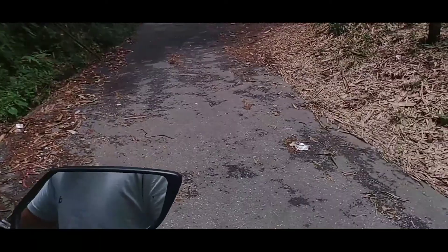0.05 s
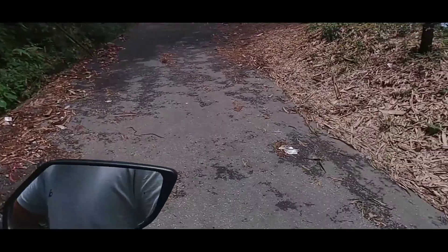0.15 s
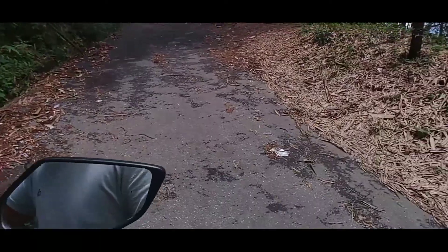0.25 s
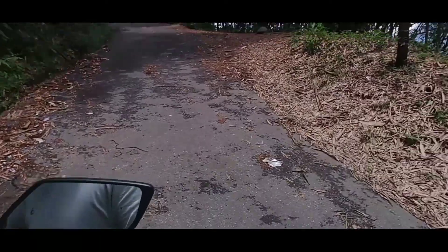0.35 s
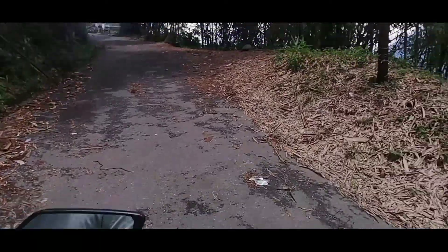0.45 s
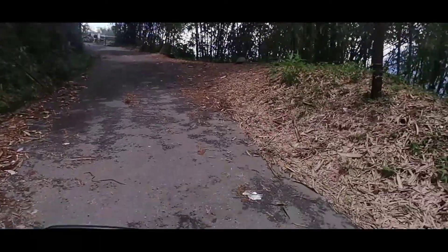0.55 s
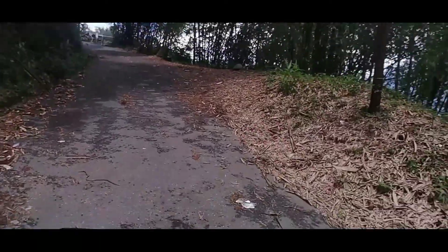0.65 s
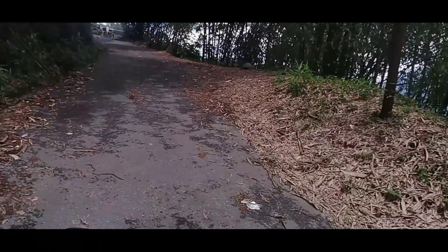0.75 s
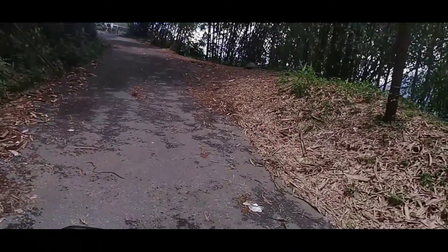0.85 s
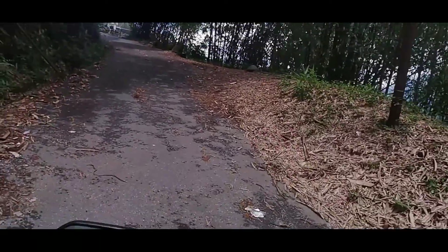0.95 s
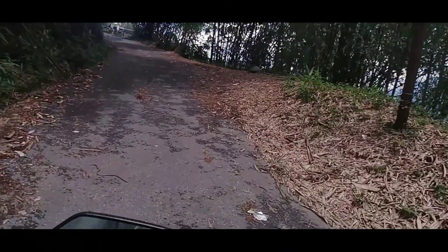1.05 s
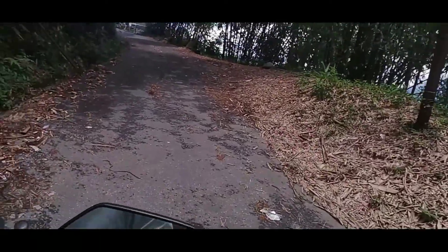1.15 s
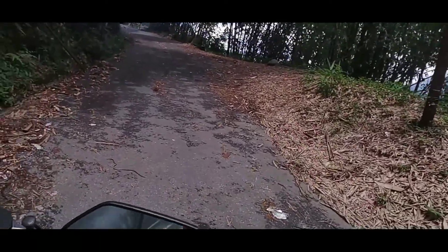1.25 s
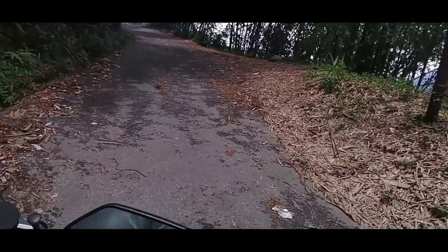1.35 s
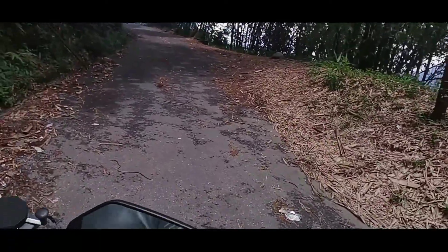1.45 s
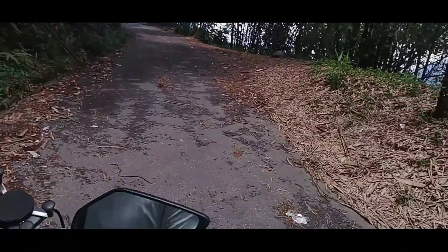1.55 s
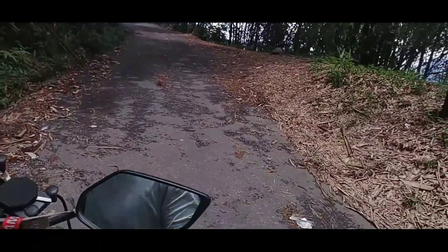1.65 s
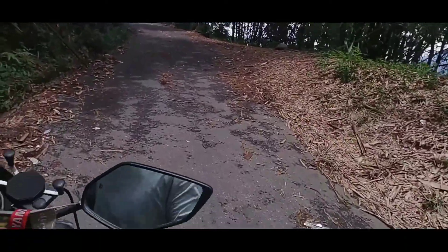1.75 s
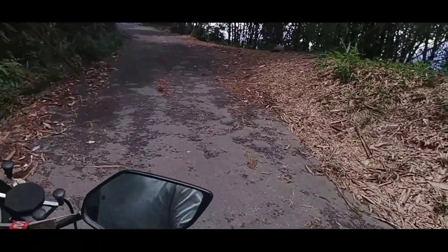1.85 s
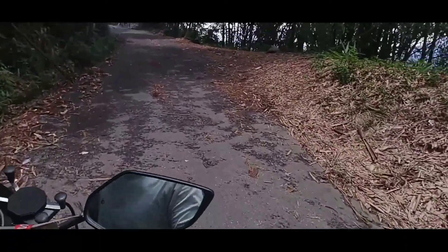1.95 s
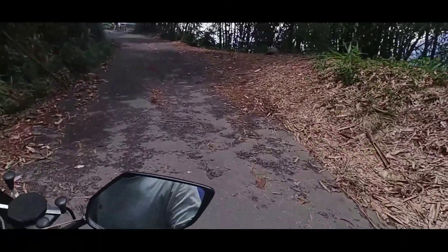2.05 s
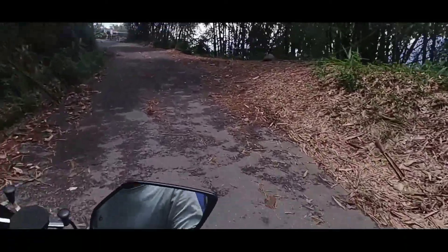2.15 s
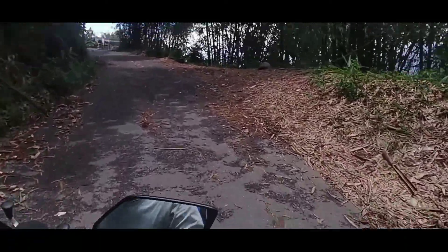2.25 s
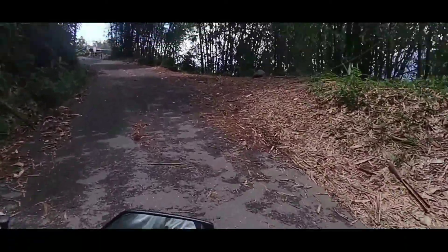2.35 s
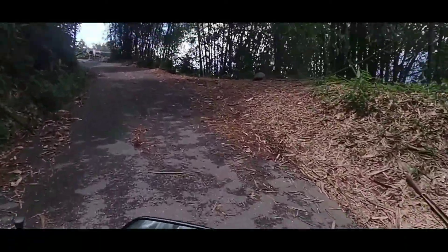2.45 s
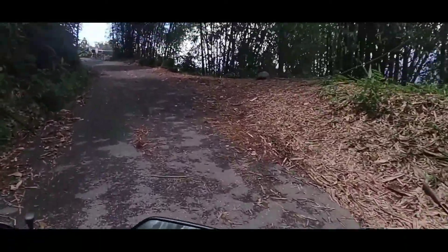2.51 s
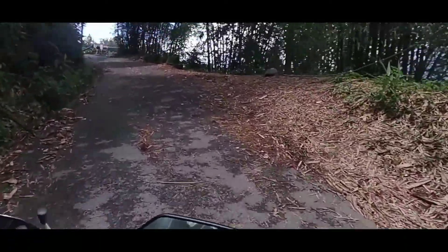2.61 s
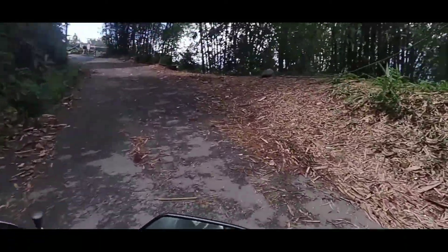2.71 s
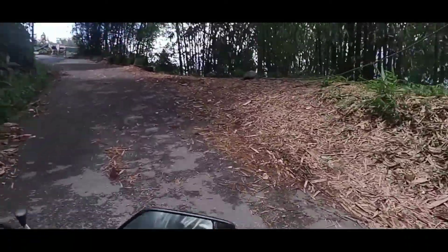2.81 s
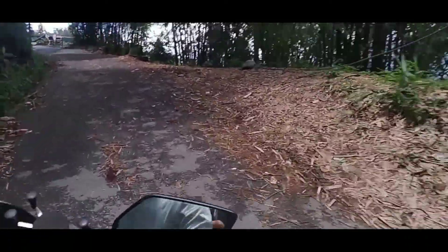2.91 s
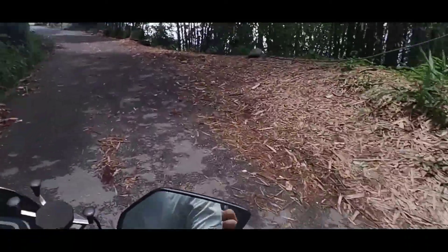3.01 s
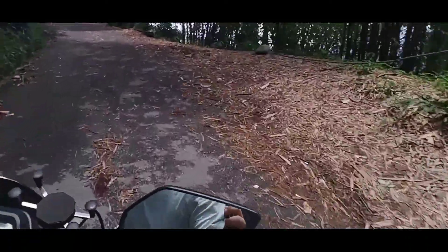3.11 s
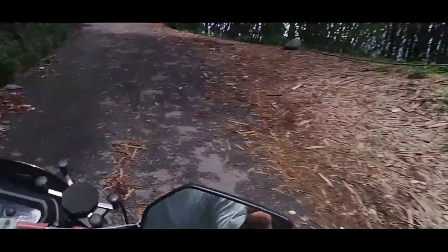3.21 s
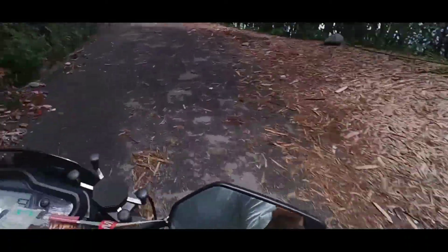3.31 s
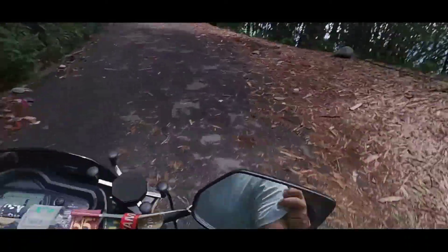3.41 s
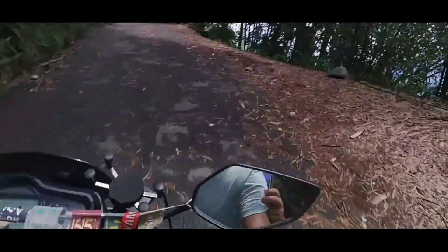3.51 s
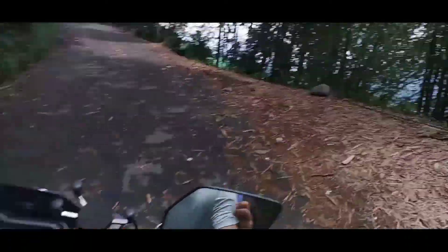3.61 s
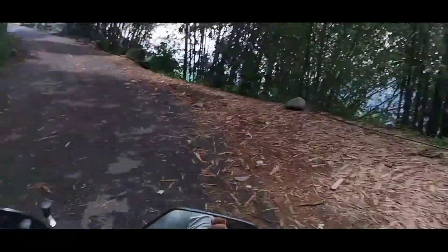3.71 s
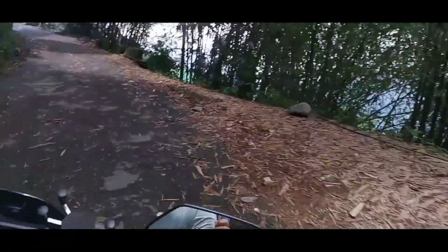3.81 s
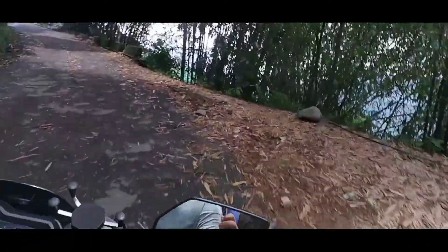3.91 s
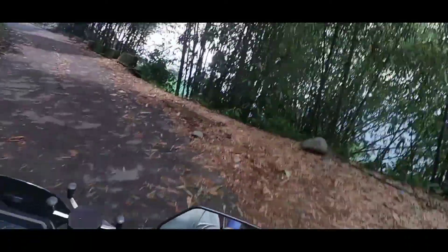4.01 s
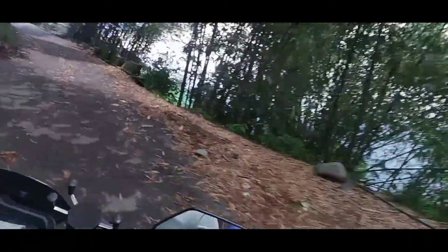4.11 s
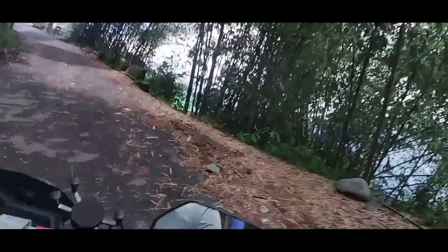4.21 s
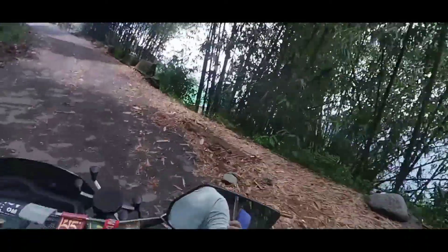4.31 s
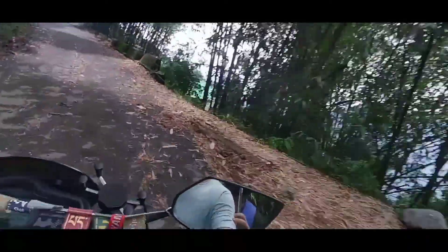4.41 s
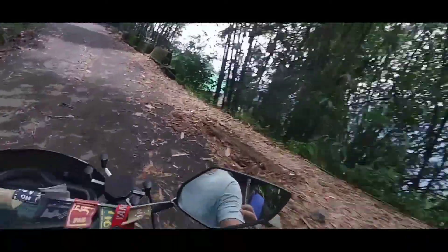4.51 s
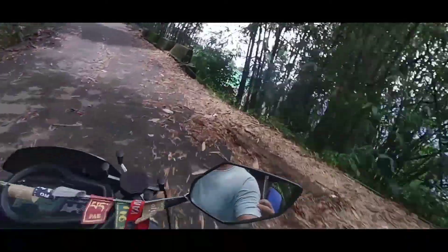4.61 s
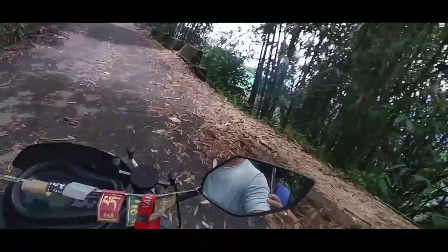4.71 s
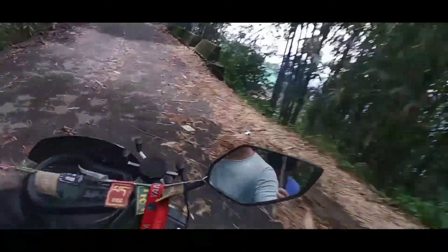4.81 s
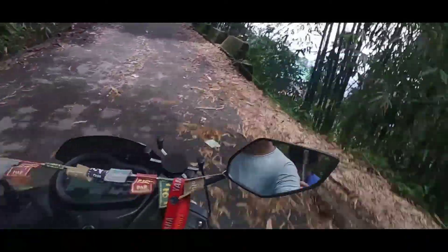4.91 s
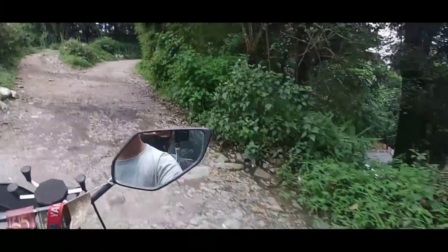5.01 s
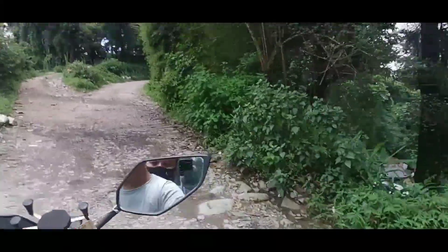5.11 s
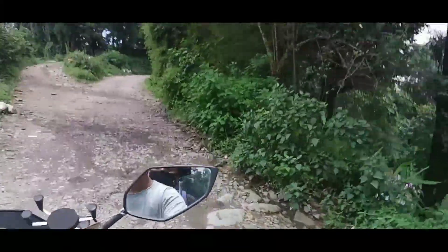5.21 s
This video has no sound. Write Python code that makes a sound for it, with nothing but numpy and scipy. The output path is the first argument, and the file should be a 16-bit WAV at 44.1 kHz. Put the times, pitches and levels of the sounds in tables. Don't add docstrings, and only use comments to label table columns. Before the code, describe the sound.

After brief silence, a small single-cylinder scooter putters up a hill road, pulls harder with rattles and wind gusts, then cuts to faint soft pulsing.

```python
import sys
import numpy as np
from scipy import signal
from scipy.io import wavfile
from scipy.ndimage import uniform_filter1d

SR = 44100
rng = np.random.default_rng(int(sys.argv[2]) if len(sys.argv) > 2 else 0)


def transcribe(u):
    v = np.clip(np.atleast_2d(u).T, -1, 1)
    q = np.round(v * 32767).astype(np.int16)
    wavfile.write(sys.argv[1], SR, q)


def to_linear_factor(level_db):
    exponent = np.asarray(level_db, float) / 20
    return 10 ** exponent


N = 231717
CRUISE_SPEED = 28


def evened(x):
    return x / np.sqrt(np.mean(x ** 2) + 1e-20)


def curves(rows):
    time_s, *columns = np.transpose(rows)
    return [np.interp(np.arange(N) / SR, time_s, column) for column in columns]


def drift(hz):
    steps = np.interp(np.arange(N) / SR * hz, np.arange(600), rng.standard_normal(600))
    return evened(uniform_filter1d(steps, size=int(SR / hz)))


def noise(points, size, patchy_db):
    frames = 4 * N // size + 5
    hz = np.fft.rfftfreq(size, 1 / SR)
    real, imaginary, patches = rng.standard_normal((frames, len(hz), 3)).T
    patches = uniform_filter1d(patches, size=8, axis=0)
    patches = evened(uniform_filter1d(patches, size=8, axis=1))
    point_hz, point_db = np.transpose(points)
    colour_db = np.interp(np.log(hz + 1), np.log(point_hz + 1), point_db, left=-90, right=-90)
    spectra = (real + 1j * imaginary) * to_linear_factor(colour_db[:, None] + patchy_db * patches)
    return evened(signal.istft(spectra, nperseg=size, noverlap=3 * size // 4)[1][:N])


def humming(modes):
    hz = np.geomspace(300, 3500, num=500)
    peaks = sum(to_linear_factor(db) / (1 + (2 * (hz - mode_hz) / width_hz) ** 2) for mode_hz, width_hz, db in modes)
    return noise(np.transpose([hz, 20 * np.log10(peaks)]), size=2048, patchy_db=1.)


def flare(cycles, at, sharp):
    return np.exp(sharp * (np.cos(2 * np.pi * (cycles - at)) - 1))


def order(k, cycles, single):
    shift = 1.2 - 1.4 * k if k > 8 else (k % 2) * (k > 4)
    gather = ((.28 - 1.07 * k - shift + 1) % 2 - 1) * (k > 2)
    return np.sqrt(2) * np.cos(2 * np.pi * k * cycles + np.pi * (shift + single * gather))


def exhaust(speed, cycles, level_db):
    # order (multiple of the firing rate), level_db
    setting_off = [(1, -10), (2, -10), (3, -34), (4, -0.5), (5, 0), (6, -8.5), (7, -8), (8, -4.5), (9, -26),
                   (10, -18), (11, -13), (12, -15), (13, -16), (14, -25), (15, -45), (16, -20), (17, -22),
                   (18, -50), (19, -24), (20, -20.5), (21, -45), (22, -37)]
    # order, level_db
    biting = [(1, -23), (2, -8), (3, -5), (4, 0), (5, -2), (6, -14), (7, -7), (8, -7), (9, -14), (10, -6),
              (11, -2), (12, -10), (13, -13), (14, -20), (15, -22), (16, -18), (17, -27), (18, -23),
              (19, -26), (20, -21), (21, -25), (22, -18)]
    # order, level_db
    slow = [(1, -24), (2, -8), (3, -1.5), (4, 0), (5, -5.5), (6, -12), (7, -6), (8, -17), (9, -11),
            (10, -12), (11, -9), (12, -17), (13, -18), (14, -20), (15, -25), (16, -19), (17, -25),
            (18, -22), (19, -21), (20, -24), (21, -22), (22, -19)]
    # order, level_db
    cruise = [(1, -23), (2, -4), (3, -3.5), (4, 1), (5, -11.5), (6, -10), (7, -6.5), (8, -20), (9, -17.5),
              (10, -21.5), (11, -22), (12, -42), (13, -21.5), (14, -25.5), (15, -63), (16, -23.5),
              (17, -23), (18, -22), (19, -23.5), (20, -55), (21, -52), (22, -28)]
    # order, level_db
    picking_up = [(1, -25), (2, -3), (3, -1.5), (4, 1.5), (5, -25), (6, -3), (7, -10), (8, -11.5), (9, -33),
                  (10, -22), (11, -35), (12, -38), (13, -26.5), (14, -21), (15, -35), (16, -40), (17, -31),
                  (18, -29), (19, -32), (20, -30), (21, -33), (22, -21)]
    # order, level_db
    pull = [(1, -29), (2, 0), (3, -9), (4, -8), (5, -20), (6, -22), (7, -26), (8, -26), (9, -32), (10, -28),
            (11, -31), (12, -31), (13, -35), (14, -36), (15, -31), (16, -35), (17, -33), (18, -31),
            (19, -34), (20, -34), (21, -35), (22, -38)]
    # order, level_db
    steadying = [(1, -29), (2, 0), (3, -11), (4, -9), (5, -17), (6, -24), (7, -26), (8, -30), (9, -36),
                 (10, -35), (11, -30), (12, -32), (13, -38), (14, -34), (15, -33), (16, -34), (17, -29),
                 (18, -34), (19, -38), (20, -30), (21, -31), (22, -38)]
    # order, level_db
    hauling = [(1, -28), (2, 0), (3, -13), (4, -10), (5, -19), (6, -25), (7, -23), (8, -22), (9, -25),
               (10, -25), (11, -23), (12, -26), (13, -31), (14, -30), (15, -28), (16, -29), (17, -25),
               (18, -34), (19, -36), (20, -27), (21, -38), (22, -34)]
    # order, level_db
    fast = [(1, -27), (2, 0), (3, -13), (4, -10), (5, -16), (6, -17), (7, -18), (8, -22), (9, -22),
            (10, -17), (11, -24), (12, -24), (13, -26), (14, -26), (15, -22), (16, -25), (17, -24),
            (18, -26), (19, -26), (20, -31), (21, -32), (22, -35)]
    pattern_speeds = (24.4, 24.6, 24.75, 24.95, 25.4, 25.9, 27.9, 29.3, 33, 35.5, 37.5, 38.5, 39.6)
    # pitch_hz, level_db
    boom = [(48.5, -48), (52, -43), (57, -40), (63.5, -32), (69.5, -22.5), (74, -29.5), (79, -21),
            (82, -25)]

    stages = [setting_off, biting, biting, slow, slow, cruise, cruise, picking_up,
              pull, pull, steadying, hauling, fast]
    patterns = np.array(stages)[:, :, 1]
    patterns = patterns - patterns[:, 3:4]
    single = np.interp(speed, (24.7, 25.1), (1, 0))
    wobble = .003 * drift(25.)
    boom_db = np.interp(2 * speed, *np.transpose(boom))
    out = np.zeros(N)
    for k, row in enumerate(patterns.T, 1):
        order_db = boom_db if k == 2 else level_db + np.interp(speed, pattern_speeds, row)
        waver_db = (.5 + 0.058 * k) * drift(12.)
        loose = .007 * drift(4.) * (k > 8)
        out += to_linear_factor(order_db + waver_db) * order(k, cycles + wobble + loose, single)
    return out


def follows(rule, speed, strain_db):
    cruise_db, db_per_rate, share = rule
    easy_db = -44
    return cruise_db + db_per_rate * (speed - CRUISE_SPEED) + share * (strain_db - easy_db)


def works(speed, cycles, casing_db):
    # cruise_db, db_per_rate [dB per firing/s], share of the strain
    chain_rule = (-59, 0.24, 0.17)
    # cruise_db, db_per_rate, share
    valve_rule = (-54, -0.48, 0.28)
    # cruise_db, db_per_rate, share
    bracket_rule = (-57, 0.25, 0.11)
    # time_s, share
    ticking = [(.7, .3), (1.0, .75), (1.3, .8), (1.5, 1), (1.75, .9), (1.88, 1.2), (2.0, .6), (2.1, 1.35),
               (2.33, 1.35), (2.45, .8), (2.7, 1), (3.0, .75)]
    flare_speeds = (25.5, 27, 30, 35)
    first_flare = ((.25, .3, .3, .15), (.5, .4, .5, 1.1))
    second_flare = ((.53, .72, .75, .7), (1.4, .8, .7, .2))
    flat_out_wake = (39.6, 40.1, 40.5, 41)
    flat_out_db = (-30, -8, -10, -7)
    # pitch_hz, width_hz, level_db
    flat_out = [(760, 40, 2), (1020, 45, -1), (1250, 40, -7), (1530, 25, 1)]
    # pitch_hz, level_db [per Hz]
    casing_colour = [(53, -44), (90, -4.5), (122, -3), (156, -10), (198, -16), (242, -9.5), (329, -15),
                     (526, -30.5), (585, -17), (1340, -23), (2200, -40.5), (2860, -77), (4840, -120)]
    # pitch_hz, width_hz, level_db
    panels = [(532, 38, 2), (579, 21, 2), (792, 29, 1.5)]
    # pitch_hz, width_hz, level_db
    brackets = [(960, 137, 1.5), (1370, 28, 7), (1542, 95, -3), (2018, 250, -6), (2600, 60, -6)]
    # pitch_hz, level_db [per Hz]
    valve_colour = [(1100, -14), (1700, -4), (2300, 0), (3300, -1), (3900, -8), (5500, -22)]
    # pitch_hz, level_db [per Hz]
    rattle_colour = [(760, -31), (1300, -4), (1570, -19.5), (1770, 1), (1930, -19.5), (2340, -5.5),
                     (2460, -5.5), (2670, -7), (2930, -8.5), (3790, -13.5), (4830, -9), (5980, -22.5),
                     (7500, -33), (9750, -64), (16500, -120)]

    rattle_db = follows(chain_rule, speed, casing_db)
    valve_db = follows(valve_rule, speed, casing_db) - rattle_db
    woken_db = np.where(speed > 37.8, 7, 0)
    bracket_db = follows(bracket_rule, speed, casing_db) + woken_db - casing_db

    place1, size1 = [np.interp(speed, flare_speeds, values) for values in first_flare]
    place2, size2 = [np.interp(speed, flare_speeds, values) for values in second_flare]
    puffs = 1 + size1 * flare(cycles, place1, sharp=5.) + size2 * flare(cycles, place2, sharp=6.)
    body = noise(casing_colour, size=1024, patchy_db=1.0) + to_linear_factor(-10) * humming(panels)
    ringing = to_linear_factor(bracket_db) * humming(brackets)
    shaken = to_linear_factor(np.interp(speed, flat_out_wake, flat_out_db)) * humming(flat_out)
    casing = evened(puffs) * (body + ringing + shaken)

    strength = to_linear_factor(.7 * rng.standard_normal(400))[(cycles - .1).astype(int)]
    strength = strength * curves(ticking)[0]
    valve_place = np.interp(speed, (26, 27.5, 28, 30, 35), (.55, .66, .67, .76, .6))
    ticks = strength * flare(cycles, valve_place, sharp=7.)
    valves = to_linear_factor(valve_db) * ticks * noise(valve_colour, size=512, patchy_db=1.)
    rattle = noise(rattle_colour, size=512, patchy_db=1.14) + valves
    return to_linear_factor(casing_db - 3.0) * casing + to_linear_factor(rattle_db - 1.0) * rattle


def wind(speed):
    # middle_s, half_length_s, buffeting_db, roar_db [against the buffeting]
    gusts = [(3.427, 0.15, -45, 0), (3.778, 0.073, -35, -11), (4.308, 0.092, -35.5, -8.5),
             (4.435, 0.074, -31.5, -6.5), (4.679, 0.093, -34.5, -3), (4.833, 0.083, -30, -6),
             (4.957, 0.06, -39, 4.5)]
    # pitch_hz, level_db [per Hz]
    buffet_colour = [(25, -20), (60, 6), (130, 1.5), (200, 2.5), (300, -2), (450, -16.5), (800, -46.5)]
    # pitch_hz, level_db [per Hz]
    roar_colour = [(180, -12.5), (300, -2.5), (400, 8.5), (650, -5), (1000, -11), (1600, -18),
                   (2500, -41.5), (6000, -39.5), (12000, -50.5)]

    t = np.arange(N) / SR
    breeze = to_linear_factor(-62.5 + 0.19 * (speed - CRUISE_SPEED))
    buffet = bright = breeze
    for middle_s, half_s, db, roar_db in gusts:
        gust = to_linear_factor(db) * np.exp(-abs((t - middle_s) / half_s) ** 3.2)
        buffet = buffet + gust
        bright = bright + to_linear_factor(roar_db) * gust
    lumps = evened(to_linear_factor(1.3 * drift(45.)))
    dull = noise(buffet_colour, size=1024, patchy_db=1.5)
    roar = noise(roar_colour, size=1024, patchy_db=1.5)
    return lumps * (buffet * dull + bright * roar)


def road():
    # pitch_hz, level_db [per Hz]
    rumble = [(15, -14), (25, 17), (45, -2.5), (80, 3), (150, -18.5)]
    return to_linear_factor(-69.5) * noise(rumble, size=4096, patchy_db=2.)


def air():
    # pitch_hz, level_db [per Hz]
    hiss = [(3240, -7.5), (5500, -9), (6050, -10.5), (8370, -12.5), (9760, -12.5), (15100, -13.5),
            (16200, -29)]
    return to_linear_factor(-72.5) * noise(hiss, size=512, patchy_db=.4)


def ring(modes, t, chance):
    contact = signal.windows.tukey(120, .3) * to_linear_factor(-60 * t[:120] / 0.0057)
    out = 0
    for (hz, db, t60_s), luck in zip(modes, chance):
        swell = np.convolve(to_linear_factor(-60 * t / t60_s), contact)[:len(t)]
        out = out + to_linear_factor(db) * swell / swell.max() * np.sin(2 * np.pi * (hz * t + luck))
    return out / abs(out).max()


def taps():
    # start_s, low_ring_db, middle_ring_db, high_ring_db, tick_db
    contacts = [(0.8116, -33, -22, -27.5, -26), (3.5922, -59, -46, -53, -43.5),
                (4.1121, -22, -32, -28.5, -29.5), (4.1188, -29, -33, -27.5, -52),
                (4.1256, -28, -43, -30, -52), (4.1300, -33, -47, -28, -52), (4.1325, -36, -43, -34, -58),
                (4.1393, -36, -46, -41, -54), (4.1410, -32, -44, -33, -38),
                (4.9606, -23, -37, -41.5, -29.5), (5.1223, -53, -43, -50, -71.5),
                (5.1252, -54, -50, -55, -71), (5.1300, -52, -41, -50, -71), (5.1400, -54, -45, -60, -72),
                (5.1650, -59, -55.5, -57, -75.5), (5.1844, -64.5, -58, -58, -55.5),
                (5.2031, -66, -55, -63, -38.5)]
    # pitch_hz, level_db, t60_s
    low_ring = [(2060, 3, 0.006), (2170, -3, 0.022), (3620, -9, 0.009), (3950, -13, 0.012)]
    # pitch_hz, level_db, t60_s
    middle_ring = [(1100, -2.5, 0.01), (1890, -3, 0.0067), (2750, 5, 0.0047)]
    # pitch_hz, level_db, t60_s
    high_ring = [(4300, -8, 0.008), (4670, -3, 0.009), (4990, 0, 0.034), (5430, -12, 0.012),
                 (5680, -5, 0.006)]
    # pitch_hz, level_db, t60_s
    tick = [(6850, 8.5, 0.0051), (7830, 10, 0.0059), (8730, 9, 0.0051), (10120, 2.5, 0.0025),
            (11800, 3, 0.0024)]
    # pitch_hz, level_db, t60_s
    glance = [(6800, -8, 0.004), (7700, -23, 0.004), (8730, 1, 0.0032), (10100, -10, 0.004),
              (11350, 0, 0.0025)]

    out = np.zeros(N + 4000)
    t = np.arange(4000) / SR
    snap = np.minimum(t / 0.0002, 1) * np.exp(-t / 0.0014)
    cracks = rng.standard_normal((len(contacts), 4000)) * snap
    cracks = signal.lfilter(*signal.butter(1, 6500, fs=SR), cracks)
    chances = rng.random((len(contacts), 4, 5))
    for (start_s, *levels_db), chance, crack in zip(contacts, chances, cracks):
        spot = out[round(start_s * SR):][:4000]
        spot += to_linear_factor(-5) * np.sqrt(to_linear_factor(levels_db[3]) * to_linear_factor(levels_db).max()) * crack
        grazing = np.argmax(levels_db) == 3
        groups = (low_ring, middle_ring, high_ring, glance if grazing else tick)
        for modes, db, luck in zip(groups, levels_db, chance):
            spot += to_linear_factor(db + 2.5) * ring(modes, t, luck)
    housing = signal.butter(8, [900, 12000], "bandpass", fs=SR, output="sos")
    return signal.sosfilt(housing, out[:N])


def buzzes():
    # start_s, length_s, pitch_hz, width_hz, level_db
    fits = [(2.6, .1, 11000, 700, -73), (3.44, .11, 11200, 700, -73)]
    out = np.zeros(N)
    t = np.arange(N) / SR
    for start_s, length_s, hz, width_hz, db in fits:
        fuzz = noise([(hz - width_hz, -25), (hz, 0), (hz + width_hz, -25)], size=256, patchy_db=4.0)
        during = (t > start_s) & (t < start_s + length_s)
        shaking = np.sin(np.pi * 27 * (t - start_s)) ** 4
        out += during * to_linear_factor(db) * shaking * fuzz
    return out


def lane():
    # order (multiple of the firing rate), level_db
    lane_orders = [(1, -13), (2, 0), (3, -1.5), (4, 3), (5, 2), (6, -3), (7, -6), (8, -8), (9, -13),
                   (10, -6), (11, -12), (12, -15)]
    # pitch_hz, level_db [per Hz]
    lane_colour = [(15, -50), (25, -16), (130, -1), (249, -10.5), (285, -5), (439, -9), (575, -16),
                   (1020, -21), (1840, -28), (2610, -26.5), (5600, -35.5), (7000, -47), (11300, -48),
                   (16000, -47)]

    rate, pulse_s, suck_s = 28.4, 5.105, .0035
    cycles = rate * (np.arange(N) / SR - pulse_s)
    suck = cycles + rate * suck_s
    engine = np.zeros(N)
    for k, db in lane_orders:
        if k < 8:
            engine += to_linear_factor(db) * np.cos(2 * np.pi * k * cycles - (k == 3))
        else:
            engine -= to_linear_factor(db) * np.cos(2 * np.pi * k * suck)
    throb = 1 + 0.19 * flare(cycles, 0.21, sharp=3.)
    bed = evened(throb * noise(lane_colour, size=1024, patchy_db=4.0))
    return to_linear_factor(-48.5) * engine + to_linear_factor(-43.5) * bed


def squeaks():
    # start_s, fade_s, pitch_hz, width_hz, level_db
    chirps = [(5.101, 0.015, 14700, 2500, -66), (5.104, .012, 13100, 496, -70),
              (5.121, .01, 15400, 1190, -67), (5.150, .007, 15100, 1800, -67),
              (5.153, 0.026, 12500, 250, -67.5)]
    out = np.zeros(N)
    t = np.arange(N) / SR
    for start_s, fade_s, hz, width_hz, db in chirps:
        fuzz = noise([(hz - width_hz, -20), (hz, 0), (hz + width_hz, -20)], size=256, patchy_db=3.0)
        out += (t > start_s) * to_linear_factor(db) * np.exp(-abs(t - start_s) / fade_s) * fuzz
    return out


def scene():
    # time_s, speed [firings per s]
    speed_line = [(0.4, 24.22), (0.6, 24.75), (1.15, 25.48), (1.45, 27.5), (1.65, 27.8), (2.75, 27.81),
                  (3.0, 28.31), (3.15, 29.1), (3.75, 35.21), (4.05, 37.44), (4.3, 38.73), (4.55, 39.05),
                  (4.67, 39.99), (5.03, 41.05)]
    # time_s, exhaust_db, strain_db [on the casing]
    load_line = [(.44, -42.5, -46.5), (.62, -41, -40.5), (.83, -36.5, -36.5), (1.0, -36, -40),
                 (1.17, -39, -39.5), (1.39, -36.5, -38.5), (1.58, -36.5, -43), (2.2, -36.5, -41.5),
                 (2.6, -37, -44), (3.0, -34, -44), (3.28, -37.5, -43.5), (3.7, -32, -41.5),
                 (4.1, -35.5, -40), (4.55, -35.5, -47), (4.71, -34.5, -36.5), (4.84, -33, -35.5),
                 (5.04, -35.5, -33)]

    speed = curves(speed_line)[0]
    exhaust_db, strain_db = curves(load_line)
    cycles = np.cumsum(speed) / SR + .14
    engine = exhaust(speed, cycles, exhaust_db) + works(speed, cycles, strain_db)
    climb = engine + wind(speed) + road() + air()
    change_s = 5.0682
    place = np.where(np.arange(N) < change_s * SR, climb, lane())
    return (place + taps() + buzzes() + squeaks())[None]


def low_pass(x):
    return signal.sosfilt(signal.butter(12, 16470, fs=SR, output="sos"), x)


def record(dry):
    start_s, fade_s = .3478, 0.00085
    on = np.clip((np.arange(N) / SR - start_s) / fade_s, 0, 1)
    return low_pass(dry * on)


dry = scene()
out = record(dry)
transcribe(out)
```